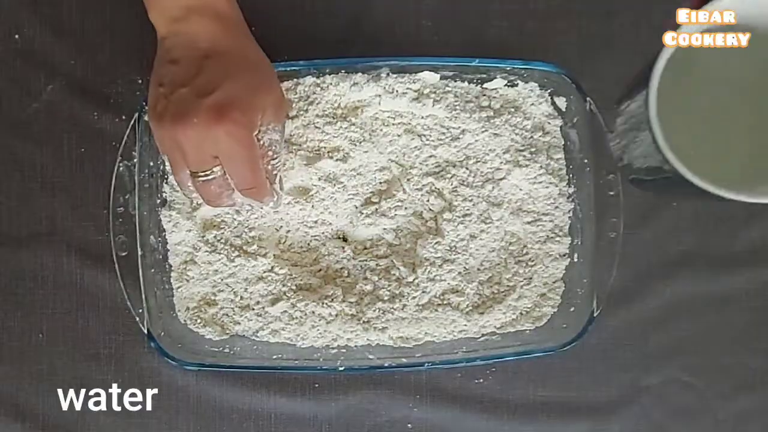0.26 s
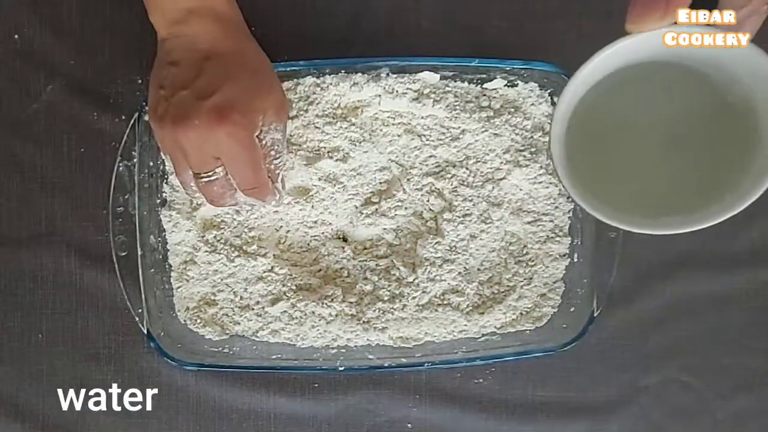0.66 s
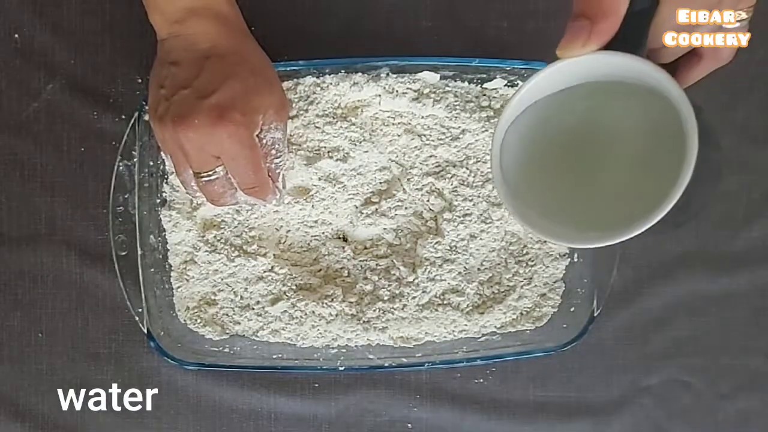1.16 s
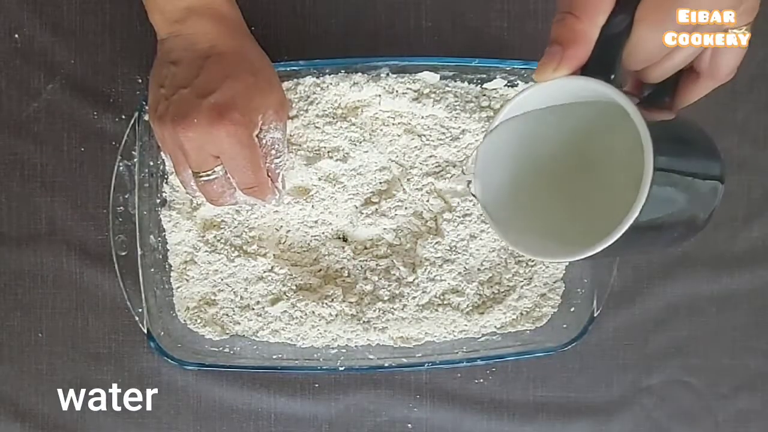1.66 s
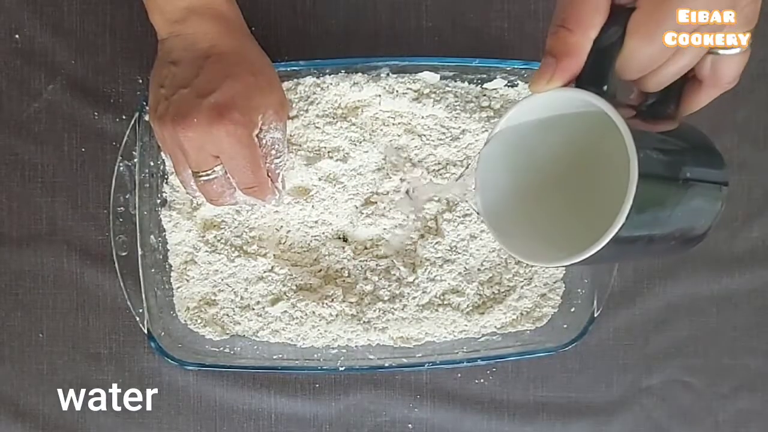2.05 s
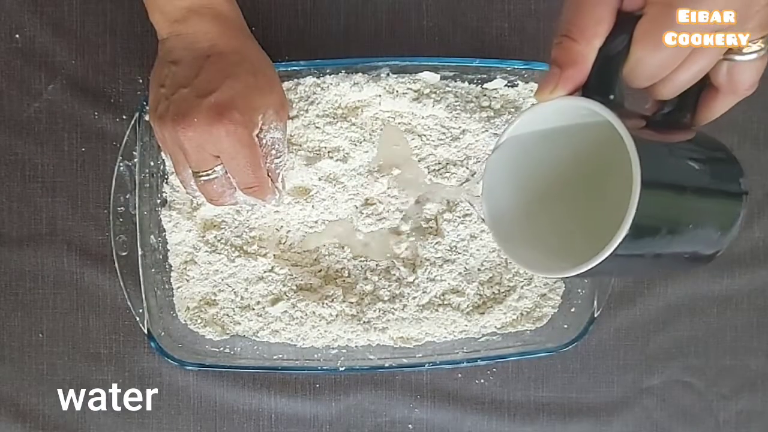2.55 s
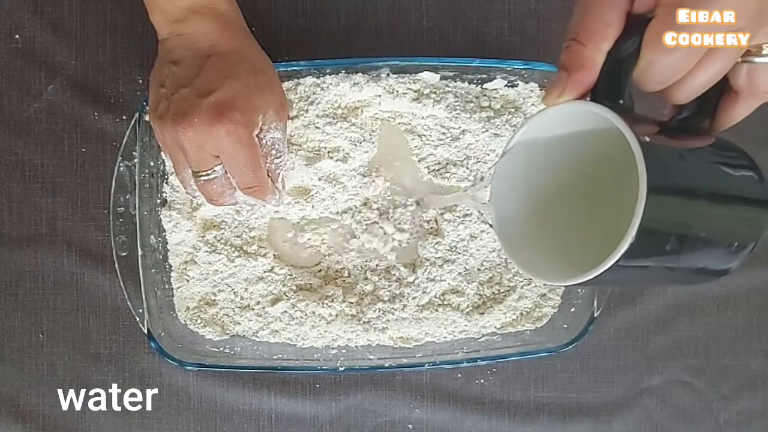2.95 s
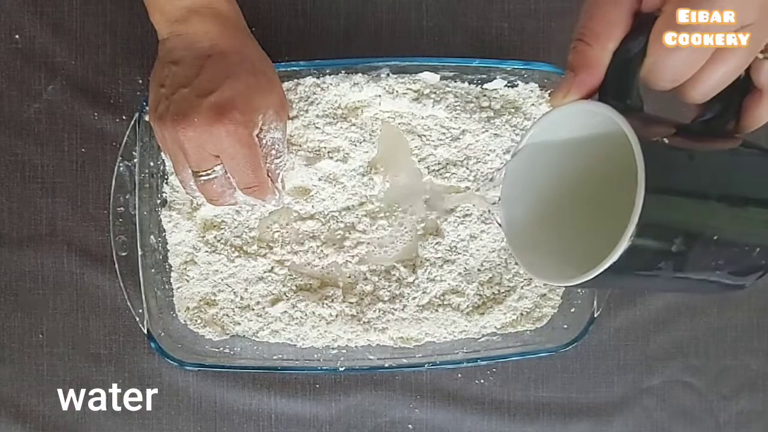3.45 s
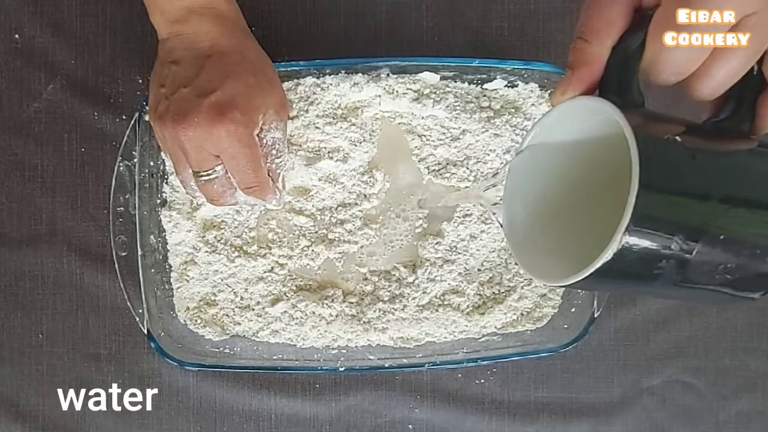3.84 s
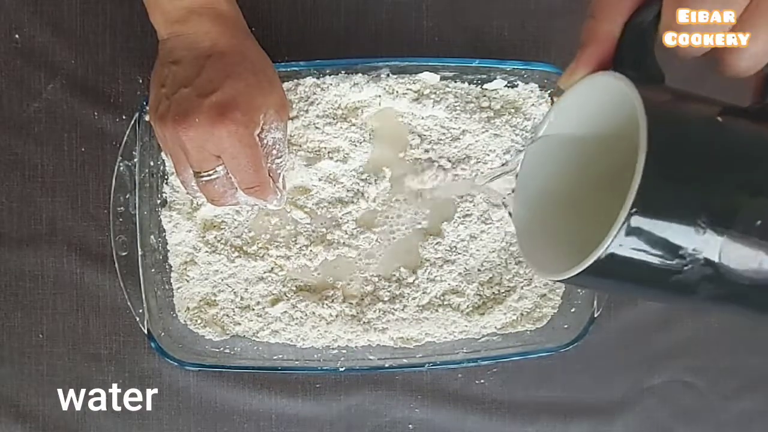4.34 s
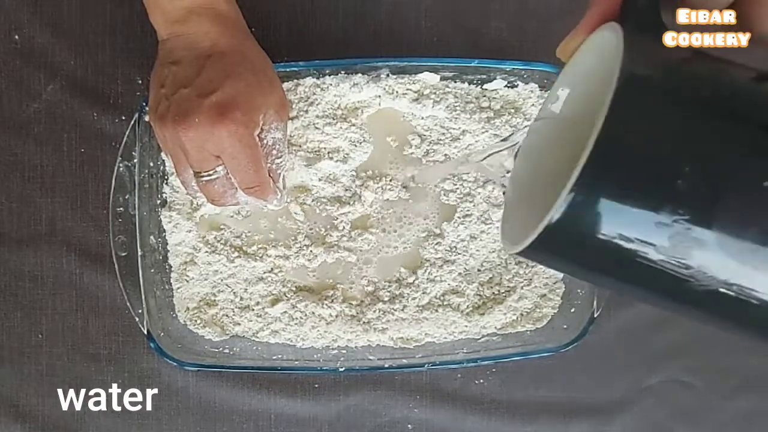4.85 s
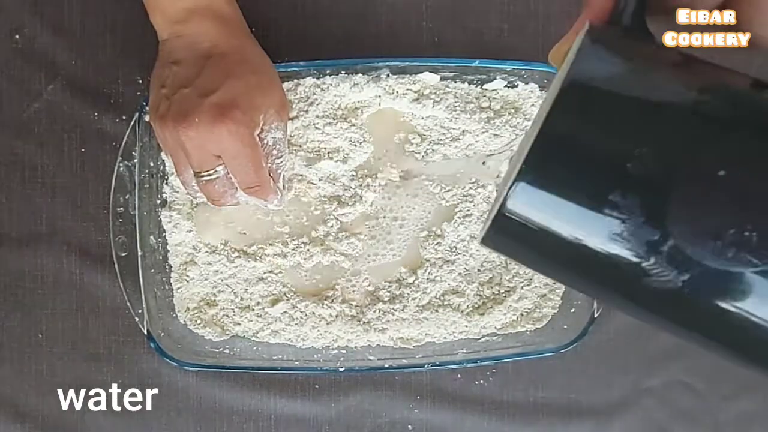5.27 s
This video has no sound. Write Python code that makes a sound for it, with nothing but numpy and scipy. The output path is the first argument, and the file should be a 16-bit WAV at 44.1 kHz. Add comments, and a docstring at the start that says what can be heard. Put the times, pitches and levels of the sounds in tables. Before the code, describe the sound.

Close view of a small kitchen with a low, wavering appliance hum and faint hiss. Fingers brush dry flour very faintly at first. Around two seconds, drips and dull slaps begin as water falls from a mug into flour in a glass dish. Bubbling gushes thicken after three and a half seconds, and a loud splashy rush comes after five.

```python
"""Water is poured from a mug into a glass dish of flour in a small kitchen, over a low appliance hum and hiss.
First fingers brush the dry flour: trains of clicks and powdery noise under soft envelopes.
Then dull thuds and a thin stream: random slaps, gulps and ringing bubbles; gushes fill pockets that rise in pitch.
Single drops burst into noise puffs and large bubbles ring as damped sines, louder from about 4 s on.
Near the end, after a short lull, comes a rush of drops and a splash of fizzing noise."""
import sys
import numpy as np
from scipy import signal
from scipy.fft import rfft, irfft
from scipy.io import wavfile
from scipy.ndimage import uniform_filter1d

SR = 44100
rng = np.random.default_rng(int(sys.argv[2]) if len(sys.argv) > 2 else 0)


def dump(signal):
    """Clip the signal to [-1, 1] and save it as 16-bit WAV at the path in sys.argv[1]."""
    limited = np.clip(np.atleast_2d(signal).T, -1, 1)
    pcm = np.round(limited * 32767).astype(np.int16)
    wavfile.write(sys.argv[1], SR, pcm)


N = 242991
TIME = np.arange(N) / SR


def gain_of(db):
    """Decibels to amplitude."""
    return 10 ** (np.asarray(db) / 20)


def evened(x):
    """Scales to rms 1."""
    return x / np.sqrt(np.mean(x ** 2) + 1e-20)


def read(points, hz):
    """Reads a spectrum on a log-frequency axis."""
    f, value = np.transpose(points)
    return np.interp(np.log(hz + 1), np.log(f + 1), value)


def level(rows, axis=1):
    """One dB column of a curve as a gain, silent outside its span."""
    rows = np.asarray(rows)
    inside = (TIME >= rows[0, 0]) & (TIME <= rows[-1, 0])
    return gain_of(np.interp(TIME, rows[:, 0], rows[:, axis])) * inside


def swell(s, length_s, rise_s, fade_s):
    """An envelope that rises, holds until length_s after its start and dies away."""
    age = np.maximum(TIME - s, 0)
    return np.minimum(age / rise_s, 1) * np.exp(-np.maximum(age - length_s, 0) / fade_s)


def add(mix, s, sound):
    """Adds a sound to the mix at time s."""
    part = mix[max(round(s * SR), 0):][:len(sound)]
    part += sound[:len(part)]


def ringing(x, response):
    """Lets every click in x ring with a response."""
    return signal.oaconvolve(x, response)[:len(x)]


def noise(points):
    """Steady noise of a given spectrum, rms 1."""
    spectrum = rfft(rng.standard_normal(N)) * gain_of(read(points, np.fft.rfftfreq(N, 1 / SR)))
    return evened(irfft(spectrum, N))


def impulse(points, size=4096):
    """A minimum-phase click of a given spectrum, faded out, energy 1."""
    log_gain = np.log(gain_of(read(points, abs(np.fft.fftfreq(size, 1 / SR)))))
    click = np.fft.ifft(np.exp(np.conj(signal.hilbert(log_gain)))).real[:size // 2]
    click = click * np.hanning(size)[size // 2:]
    return click / np.linalg.norm(click)


def colour(x, points):
    """Filters x so that every click in it has a given spectrum."""
    return ringing(x, impulse(points))


def clicks(per_s, spread_db):
    """A random train of clicks of either sign, mostly small, a few large."""
    size = gain_of(spread_db * np.minimum(rng.exponential(1, N), 3))
    return size * rng.choice([-1, 1], N) * (rng.random(N) < per_s / SR)


def steadied(x, size=4000):
    """Holds the running rms of a grain texture near 1."""
    power = uniform_filter1d(uniform_filter1d(x ** 2, size), size)
    return x / np.sqrt(abs(power) + np.mean(x ** 2) / 20)


def bubble(hz, decay_s, glide=0.0067, size=1024):
    """A bubble rings for a few cycles, its pitch rising as it nears the surface."""
    t = np.arange(size) / SR
    age = t / max(decay_s, 1e-4)
    turns = np.cumsum(hz * (1 + glide * np.minimum(age, 2))) / SR
    ring = np.sin(2 * np.pi * turns) * np.exp(-age) * (1 - np.exp(-turns * 2))
    return ring / abs(ring).max()


# Microphone hiss spectrum. Each row: frequency in Hz, relative density in dB per Hz.
HISS_SPECTRUM = [(710, -3), (1200, 1), (1560, 0), (1830, -1.5), (2150, -4), (3150, -15), (3400, -3.5),
                 (6580, -23), (7250, -2), (11300, 1.5), (14000, 4.5), (16000, -10)]


def hiss():
    """Steady microphone noise."""
    return gain_of(-77.5) * noise(HISS_SPECTRUM)


# Steady hum tones. Each row: frequency in Hz, level in dB rms.
HUM_TONES = [(48.4, -88), (196.8, -61.5), (301.5, -58), (404, -71)]
# Air rumble spectrum. Each row: frequency in Hz, relative density in dB per Hz.
RUMBLE_SPECTRUM = [(20, -62), (33, -23.5), (48, -10), (100, -9.5), (140, -1), (172, -7), (226, 3),
                   (290, -4), (375, -1.5), (405, 2.5), (465, -3), (530, -16.5), (700, -25), (1100, -38),
                   (2200, -42.5)]
# Droning appliance resonances. Each row: frequency in Hz, half-width at -6 dB in Hz, relative level in dB.
DRONE_MODES = [(306.1, 15, 3.5), (314.4, 20.4, 4.5), (334, 9.7, -11.5)]
# Drone swell. Each row: time in seconds, level in dB before the trim below.
DRONE_SWELL = [(0.0, -60.5), (0.35, -49.5), (0.41, -89), (0.5, -46), (0.86, -62), (0.9, -47), (1.21, -59),
               (1.24, -45), (1.49, -54), (1.61, -49), (2.46, -52), (2.5, -45.5), (2.87, -55.5), (2.99, -47),
               (4.56, -56), (4.59, -49.5), (5.36, -48.5), (5.51, -73)]
RUMBLE_RMS_DB, DRONE_TRIM_DB = -59.5, 1.07


def hum():
    """Steady tones, air rumble, and close noise-driven resonances that beat and swell."""
    tones = np.zeros(N)
    for hz, db in HUM_TONES:
        tones += gain_of(db) * np.sqrt(2) * np.sin(2 * np.pi * (hz * TIME + rng.random()))
    f = np.fft.rfftfreq(N, 1 / SR)
    shape = sum(gain_of(db) / (1 + ((f - hz) / width) ** 2) for hz, width, db in DRONE_MODES)
    drone = steadied(irfft(rfft(rng.standard_normal(N)) * shape, N))
    rumble = gain_of(RUMBLE_RMS_DB) * noise(RUMBLE_SPECTRUM)
    return tones + rumble + gain_of(DRONE_TRIM_DB) * level(DRONE_SWELL) * drone


# Rub and rustle spectra. Each row: frequency in Hz, relative density in dB per Hz.
RUB_SPECTRUM = [(500, -11), (900, -9), (1300, -3.5), (1650, -1), (1950, -10), (2400, -29), (3500, -26),
                (4500, -35)]
RUSTLE_SPECTRUM = [(3300, -28), (4000, -17), (4800, -19), (5700, -1), (6900, -5), (8400, 1), (10500, -13),
                   (13500, 5.5), (16000, -19)]
# Finger strokes in flour. Each row: start in seconds, length in seconds, level in dB.
STROKES = [(-0.01, 0.058, -70), (0.178, 0.037, -69), (0.455, .11, -73.5)]
STROKE_RISE_S, STROKE_FADE_S = 0.0094, 0.04
# Loose powder sliding. Each row: start in seconds, length in seconds, level in dB.
SLIDES = [(-0.03, 0.15, -74.5), (0.727, 0.063, -79)]
SLIDE_RISE_S, SLIDE_FADE_S = 0.025, 0.12


def fingers():
    """Strokes in dry powder: dense grain clicks for the rub, smooth noise for the slide."""
    rub = evened(colour(clicks(3000, 3), RUB_SPECTRUM))
    press = sum(gain_of(db) * swell(s, length_s, STROKE_RISE_S, STROKE_FADE_S) for s, length_s, db in STROKES)
    slide = sum(gain_of(db) * swell(s, length_s, SLIDE_RISE_S, SLIDE_FADE_S) for s, length_s, db in SLIDES)
    return press * rub + slide * noise(RUSTLE_SPECTRUM)


# Fizzing splashes. Each row: start in seconds, level in dB, rise in seconds, decay time in seconds,
# whistle in dB re the fizz.
FIZZES = [(2.652, -66, .001, 0.047, -31), (3.281, -72.5, .001, 0.15, -6), (5.227, -40, 0.0094, 0.039, -9)]
# Fizz spectrum. Each row: frequency in Hz, relative density in dB per Hz.
FIZZ_SPECTRUM = [(1500, -7), (4500, -5), (6500, -4), (8200, 4), (9500, -8), (11300, -3), (12800, 5),
                 (14200, 13), (15600, -1), (17000, -35)]


def fizzes():
    """A splash breaks into a hiss that dies away, with a faint whistle (narrow noise) in it."""
    out = np.zeros(N)
    fizz = noise(FIZZ_SPECTRUM)
    whistle = noise([(4300, -44), (5050, -6), (5400, -5), (5800, -14), (7000, -29)])
    for s, db, rise_s, decay_s, whistle_db in FIZZES:
        age = np.maximum(TIME - s, 0)
        envelope = np.minimum(age / rise_s, 1) * np.exp(-age / decay_s)
        out += gain_of(db) * envelope * (fizz + gain_of(whistle_db) * whistle)
    return out


# Water-on-wet-flour spectrum. Each row: frequency in Hz, relative density in dB per Hz.
SLAP_SPECTRUM = [(250, -2), (480, 8), (630, -17.5), (720, -2), (830, 0), (1000, -7), (1250, -18),
                 (1500, -4.5), (1950, -7), (2400, -15), (4000, -24), (10000, -36.5)]
# Large bubbles. Each row: time in seconds, relative peak in dB, pitch in Hz.
BUBBLES = [(2.7916, -54, 1590), (2.82, -53, 1770), (2.8354, -51.5, 1620), (2.8729, -52, 1870),
           (3.1312, -48.5, 1740), (3.4002, -45, 1750), (3.5199, -48, 3330), (3.5553, -45, 1620),
           (3.5834, -41.5, 1990), (3.6207, -44, 2640), (3.6885, -39, 1980), (3.7286, -37, 1870),
           (3.8335, -48.5, 2040), (3.9621, -44.5, 3400), (4.147, -38, 1940), (4.1614, -42, 1970),
           (4.2076, -34.5, 1500), (4.2406, -37, 1640), (4.2597, -39, 1960), (4.3286, -41, 3660),
           (4.3629, -44, 1640), (4.3868, -43, 2760), (4.9833, -35, 2500), (5.0682, -36, 1760),
           (5.0844, -59, 1890), (5.1253, -31, 1740), (5.2273, -36.5, 1560), (5.3344, -41, 1910),
           (5.4143, -37.5, 1800), (5.456, -40.5, 1940)]
PLIP_DECAY_CYCLES = 3.06


def plips():
    """Larger pockets of air ring in the puddle; the bigger the pocket, the more it pushes the wet flour."""
    out = np.zeros(N)
    slap = impulse(SLAP_SPECTRUM, size=2048)
    for s, db, hz in BUBBLES:
        push = gain_of(13.5) * (1700 / hz) ** 2
        add(out, s + 0.00052, gain_of(db - 5.5) * (bubble(hz, PLIP_DECAY_CYCLES / hz) + push * slap))
    return out


BURST_RISE_S = 0.00025


def burst(hz, decay_s, ring_db, size=1024):
    """A droplet bursts: a puff of noise round its pitch and a brief ring."""
    t = np.arange(size) / SR
    puff = rng.standard_normal(size) * np.exp(-t / decay_s) * (1 - np.exp(-t / BURST_RISE_S))
    band = [(hz * 0.33, -40), (hz * 0.74, -8), (hz, 0), (hz * 1.33, -10), (hz * 1.5, -35)]
    crack = evened(colour(puff, band))
    return evened(crack + gain_of(ring_db) * evened(bubble(hz, decay_s, glide=0.0073)))


# Single drops. Each row: time in seconds, then relative levels in dB of tick, slap and finest spray.
DROPS = [(1.9768, -49.5, -73, -65), (2.2006, -51, -94, -67), (2.2302, -47.5, -96, -83),
         (2.3333, -48.5, -57.5, -58), (2.3539, -48.5, -66, -62), (2.3952, -74, -55, -62.5),
         (2.449, -91, -56.5, -75), (2.648, -52, -61, -43), (2.6651, -54, -52, -54),
         (3.1774, -43, -59.5, -84), (3.2812, -33, -55, -43.5), (3.459, -46.5, -71, -64),
         (4.1013, -37, -51, -48), (4.1652, -40, -61, -59), (4.1818, -49, -47, -48.5),
         (4.2374, -44.5, -59, -65), (4.2629, -41.5, -57, -59), (4.2782, -59, -60, -54),
         (4.4042, -41, -51.5, -51.5), (4.5086, -38, -46.5, -51.5), (4.5463, -42, -46.5, -59),
         (4.6218, -41, -52.5, -70), (4.6742, -39, -44.5, -54), (4.7064, -43.5, -50, -52.5),
         (4.8646, -39, -55, -59), (4.9296, -40, -46.5, -57), (4.9513, -46, -50.5, -68),
         (4.9781, -40, -44.5, -69), (5.0494, -29, -48.5, -43.5), (5.0617, -41, -58, -52),
         (5.086, -47, -49, -42), (5.0974, -35.5, -51, -66), (5.1719, -30.5, -40.5, -42),
         (5.2046, -43, -45, -49), (5.3235, -35, -53, -46.5), (5.3826, -36, -63, -47),
         (5.4005, -47, -49.5, -64)]
SPLATTER_HZ, TICK_HZ, FINE_HZ = 3670, 7720, 12940
SPLATTER_S, TICK_S, FINE_S = 0.00044, 0.0015, 0.0018  # decay times
STRAY_OCTAVES = 0.033  # pitch scatter of splatter and tick
REBOUND_MAX_S, REBOUND_DB = 0.012, -14


def drops(count=3):
    """Each drop slaps the wet flour and breaks into droplets of three sizes, a few of which fall back."""
    out, slap = np.zeros(N), evened(impulse(SLAP_SPECTRUM, size=2048))
    strays = 2 ** (STRAY_OCTAVES * rng.standard_normal((len(DROPS), 2)))
    delays_s = REBOUND_MAX_S * rng.uniform(.25, 1, (len(DROPS), count))
    for (s, tick_db, slap_db, fine_db), stray, flights_s in zip(DROPS, strays, delays_s):
        splatter_db = (tick_db + slap_db) / 2 - 24.0
        splatter = gain_of(splatter_db) * burst(SPLATTER_HZ * stray[0], SPLATTER_S, 0)
        tick = gain_of(tick_db - 21) * burst(TICK_HZ * stray[1], TICK_S, -0.48)
        fine = gain_of(fine_db - 9.5) * burst(FINE_HZ, FINE_S, -6)
        droplets = splatter + tick + fine
        add(out, s + .0005, gain_of(slap_db - 8.5) * slap + droplets)
        for flight_s in flights_s:
            add(out, s + flight_s, gain_of(REBOUND_DB) * droplets)
    return out


# Thud level as the mug tilts and the stream hits the puddle. Each row: time in seconds, level in dB before trim.
THUD_LEVEL = [(1.45, -69), (1.66, -58.5), (1.85, -68), (3.95, -76), (4.7, -59), (5.15, -51), (5.35, -53.5),
              (5.51, -75)]
# Thud spectrum. Each row: frequency in Hz, relative density in dB per Hz.
THUD_SPECTRUM = [(20, -30), (35, -5), (50, -11), (90, -9), (140, -4.5), (260, -10.5), (600, -39),
                 (2000, -87)]


def thudding():
    """Dull thuds: sparse clicks of uneven strength in a low spectrum."""
    return gain_of(-3) * level(THUD_LEVEL) * steadied(colour(clicks(40, 6.6), THUD_SPECTRUM))


GULP_DECAY_CYCLES = 1.5


def pattering(count=14):
    """Small slaps on wet flour, mixed with low, quickly damped gulps."""
    gulps = np.zeros(N)
    for hz in np.geomspace(600, 1100, count):
        gulps += ringing(clicks(12, 4.3), bubble(hz, GULP_DECAY_CYCLES / hz))
    slaps = colour(clicks(260, 5.2), SLAP_SPECTRUM)
    return steadied(evened(slaps) + .8 * evened(gulps))


# Dish colouring of the bubbling. Each row: frequency in Hz, relative gain in dB.
DISH_SPECTRUM = [(1100, -1), (1500, -0.5), (2000, 3.5), (2400, -14.5), (3000, -0.5), (3700, 7), (4300, 7.5),
                 (4900, 4.5), (6000, 14.5)]
BUBBLES_PER_S, BUBBLE_SPREAD_DB, BUBBLE_DECAY_CYCLES = 36, 3.7, 1.88  # rate per pitch
GATHER_OCTAVES = 0.58


def bubbling(centre_hz, count=26):
    """Swarms of tiny bubbles whose sizes gather round the pitch of the filling pocket."""
    swarm = np.zeros(N)
    for hz in np.geomspace(1100, 4700, count):
        share = np.exp(-(np.log2(hz / centre_hz) / GATHER_OCTAVES) ** 2)
        births = clicks(BUBBLES_PER_S, BUBBLE_SPREAD_DB) * share
        swarm += ringing(births, bubble(hz, BUBBLE_DECAY_CYCLES / hz, glide=0.018))
    return steadied(colour(swarm, DISH_SPECTRUM))


# Spray spectrum. Each row: frequency in Hz, relative density in dB per Hz.
SPRAY_SPECTRUM = [(4000, -17), (5500, -10.5), (6800, -6.5), (7300, -6), (8300, -1), (8900, -15),
                  (10200, -1), (11400, -7), (12400, 7.5), (14000, 2.5), (15500, -32), (17000, -10)]
PINHEADS_PER_S, PINHEAD_SPREAD_DB, PINHEAD_DECAY_CYCLES = 9, 4.2, 3.3  # rate per pitch


def spraying(low_hz, high_hz, count=15):
    """Pinhead bubbles burst, each with a very short ring of its own pitch."""
    swarm = np.zeros(N)
    for hz in np.geomspace(low_hz, high_hz, count):
        ring = bubble(hz, PINHEAD_DECAY_CYCLES / hz, glide=0.018)
        swarm += ringing(clicks(PINHEADS_PER_S, PINHEAD_SPREAD_DB), ring)
    return steadied(colour(swarm, SPRAY_SPECTRUM))


def resonate(x, hz, width_hz):
    """A one-pole resonance that follows the pitch curve hz."""
    turn = np.exp(2j * np.pi * np.cumsum(hz) / SR)
    r = np.exp(-np.pi * width_hz / SR)
    return 2 * (turn * signal.lfilter([1 - r], [1, -r], x / turn)).real


POCKET_WIDTH_HZ, POCKET_BLOWS_PER_S = 420, 240


def gurgling(centre_hz):
    """Water striking a pocket makes its air ring, higher as the pocket fills."""
    blows = clicks(POCKET_BLOWS_PER_S, 1.7)
    broad = resonate(blows, centre_hz, 4 * POCKET_WIDTH_HZ)
    return steadied(resonate(broad, centre_hz, POCKET_WIDTH_HZ), size=1500)


CLUMP_S = 0.016


def clumps():
    """Smooth random unevenness of the flow, rms 1."""
    smoothing = np.exp(-(np.fft.rfftfreq(N, 1 / SR) * CLUMP_S) ** 2)
    return evened(irfft(rfft(rng.standard_normal(N)) * smoothing, N))


# Gushes into flour pockets. Each row: start in seconds, length in seconds, patter in dB before trim,
# bubbling in dB before trim, starting bubble pitch in Hz.
GUSHES = [(2.333, .16, -71, -105, 1440), (2.639, 0.051, -62.5, -81, 1640), (2.777, 0.031, -91, -87, 1600),
          (3.144, 0.16, -80, -70.5, 1770), (3.267, 0.079, -62.5, -89, 2370), (3.4, 0.23, -89, -72.5, 1890),
          (3.565, 0.099, -59.5, -63.5, 1680), (3.684, 0.097, -58.5, -69, 1660),
          (3.816, 0.17, -79, -63.5, 2040), (4.124, 0.045, -51.5, -53, 1700), (4.199, 0.061, -63, -55, 1700),
          (4.307, 0.09, -77, -77, 2310), (4.49, 0.17, -61, -71, 1620), (4.918, 0.082, -54.5, -60.5, 1930),
          (5.051, 0.082, -66, -78, 1730), (5.311, 0.095, -89, -58, 1860)]
GUSH_RISE_S, GUSH_FADE_S = 0.036, 0.0079
REST_BUBBLE_HZ, FILL_OCTAVES = 2200, 0.77


def gushes():
    """Gush gains for patter and bubbling, and the bubble pitch, which climbs while a pocket fills."""
    patter, gushing = np.zeros(N), np.zeros(N)
    centre_hz = np.full(N, float(REST_BUBBLE_HZ))
    for s, length_s, patter_db, bubble_db, start_hz in GUSHES:
        gush = swell(s, length_s, GUSH_RISE_S, GUSH_FADE_S)
        patter += gain_of(patter_db - 4) * gush
        gushing += gain_of(bubble_db) * gush
        filling = (TIME > s) & (TIME < s + length_s + 2 * GUSH_FADE_S)
        filled = np.minimum((TIME[filling] - s) / length_s, 1)
        centre_hz[filling] = start_hz * 2 ** (FILL_OCTAVES * filled)
    return patter, gushing, centre_hz


# Steady stream as the mug tilts. Each row: time in seconds, then patter, bubbling and fine spray in dB
# before trims.
POUR = [(1.85, -77, -85, -83), (2.27, -68, -88, -74.5), (2.52, -63.5, -70, -75.5), (2.92, -69.5, -73, -76),
        (3.15, -75, -75, -77.5), (3.51, -59.5, -66, -74.5), (3.75, -83, -65.5, -77),
        (3.97, -69, -75, -78.5), (4.15, -63, -64, -62.5), (4.31, -64.5, -53.5, -68.5),
        (4.53, -65, -64, -69), (4.68, -59, -72, -72), (4.94, -58.5, -62.5, -62.5),
        (5.09, -84, -50.5, -61.5), (5.18, -55.5, -51.5, -60), (5.51, -63, -57.5, -66)]
PATTER_CLUMP_DB, POCKET_DB = 2.5, -9.5
MIST_REF_DB, MIST_GROWTH = -55, 0.54
LULL_S, LULL_LENGTH_S, LULL_DB = 4.73, 0.065, -8  # the stream thins before the last rush


def stream():
    """Falling water patters on flour, traps bubbles and throws spray; each gush adds flow and gurgles."""
    gush_patter, gushing, centre_hz = gushes()
    patter = gain_of(-5.5) * level(POUR) + gush_patter
    bubbles = gain_of(-5.5) * level(POUR, axis=2) + gain_of(-7.5) * gushing
    spray = gain_of(-1) * level(POUR, axis=3) + gain_of(-25.5) * gushing
    # mist grows faster than the spray
    mist = gain_of(-2.0) * spray * (spray / gain_of(MIST_REF_DB)) ** MIST_GROWTH
    clumping = evened(gain_of(PATTER_CLUMP_DB * clumps()))
    wet = clumping * (patter * pattering() + bubbles * bubbling(centre_hz))
    fine = spray * spraying(5320, 10100) + mist * spraying(12000, 14600)
    gurgle = gain_of(POCKET_DB) * gushing * gurgling(centre_hz)
    lull = gain_of(LULL_DB * swell(LULL_S, LULL_LENGTH_S, 0.023, 0.034))
    return lull * (wet + fine + gurgle) + thudding()


# Dish and mug resonances. Each row: frequency in Hz, width in Hz, relative level in dB.
HOLLOWS = [(630, 31, -2), (804, 44, -4.5), (897, 38, -14)]


def hollow(x):
    """The dish and the mug above it ring briefly with the water."""
    t = np.arange(2048) / SR
    ring = np.zeros(len(t))
    for hz, width_hz, db in HOLLOWS:
        decay = 2 * np.pi * width_hz / SR * np.exp(-np.pi * width_hz * t)
        ring += gain_of(db) * decay * np.cos(2 * np.pi * hz * t)
    return x + ringing(x, ring)


# Kitchen reverberation. Each row: frequency in Hz, t60 in seconds.
ROOM_T60 = [(300, 0.36), (2000, 0.58), (8000, 0.88), (15000, 0.1)]


def kitchen(x, size=22050):
    """Quick random echoes from the dish and mug, then the room's tail, decaying per frequency."""
    t = np.arange(size) / SR
    taps = rng.standard_normal(size) * (rng.random(size) < 4000 / SR) * (t > .0006)
    early = taps * np.exp(-t / 0.008)
    hz, age, z = signal.stft(taps * (t > .006), SR, nperseg=256)
    decay = gain_of(-60 * age / read(ROOM_T60, hz)[:, None])
    tail = signal.istft(z * decay, SR, nperseg=256)[1][:size]
    echo = gain_of(-11) * early / np.linalg.norm(early) + gain_of(-10) * tail / np.linalg.norm(tail)
    return x + ringing(x, echo)


def scene():
    """Water and fingers in the kitchen, over hum and hiss."""
    water = hollow(stream() + drops() + plips())
    near = kitchen(water + fizzes() + fingers())
    return (near + hum() + hiss())[None]


EDGE_HZ = 16050


def record(dry):
    """The recorder's band limit: a linear-phase lowpass."""
    lowpass = signal.firwin(511, EDGE_HZ, window=("kaiser", 9), fs=SR)
    return signal.oaconvolve(dry, lowpass[None], "same")


dry = scene()
out = record(dry)
dump(out)
```